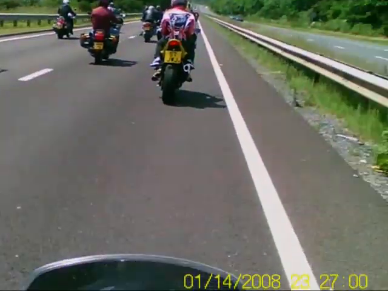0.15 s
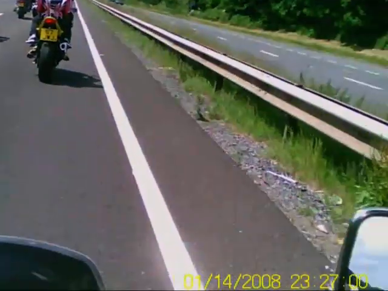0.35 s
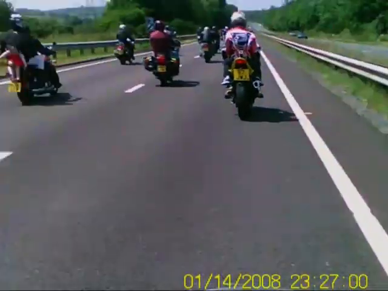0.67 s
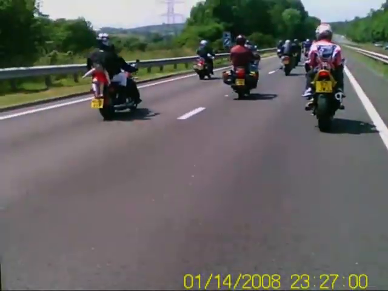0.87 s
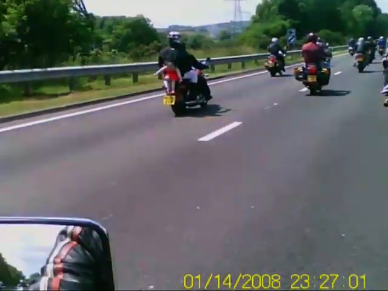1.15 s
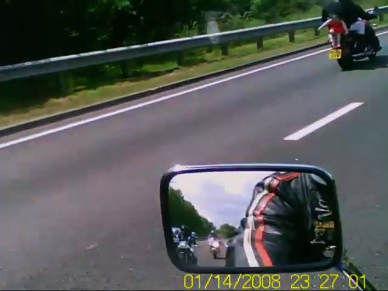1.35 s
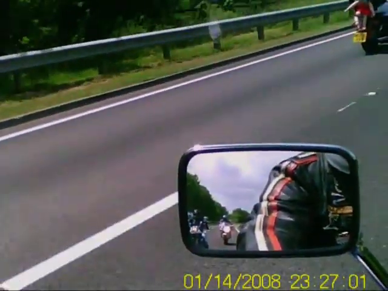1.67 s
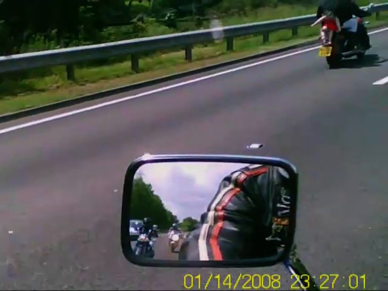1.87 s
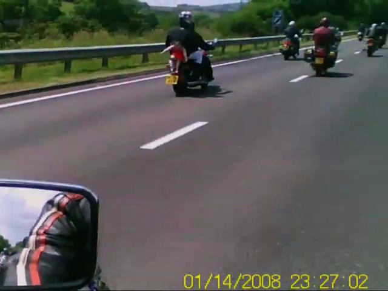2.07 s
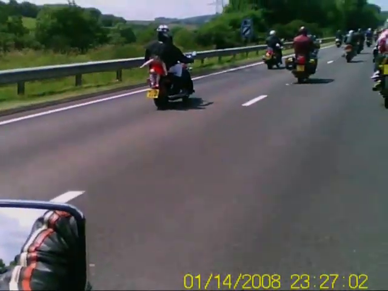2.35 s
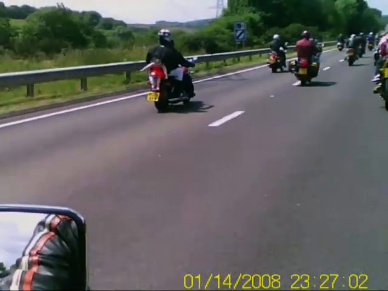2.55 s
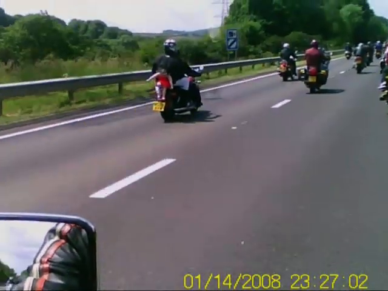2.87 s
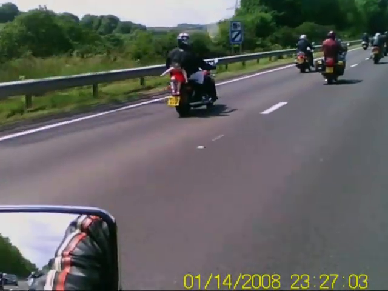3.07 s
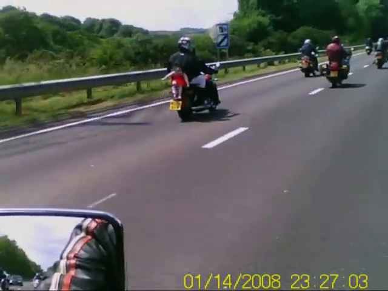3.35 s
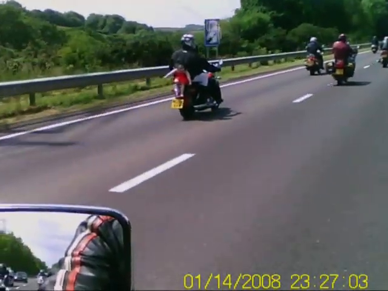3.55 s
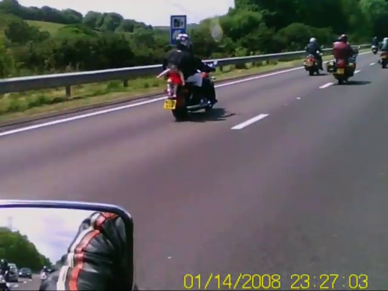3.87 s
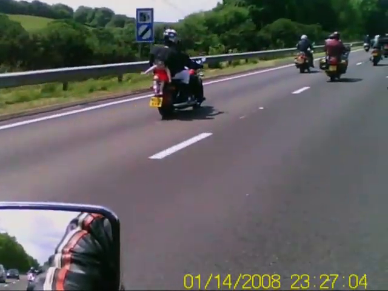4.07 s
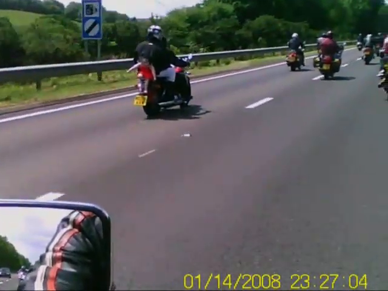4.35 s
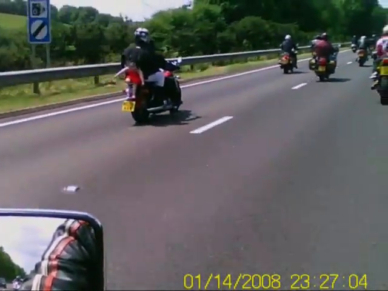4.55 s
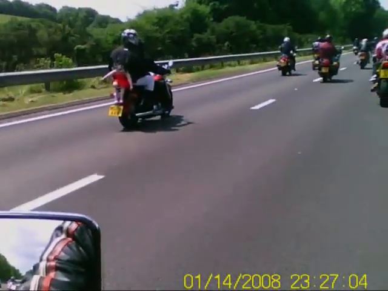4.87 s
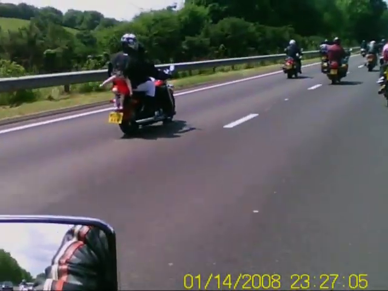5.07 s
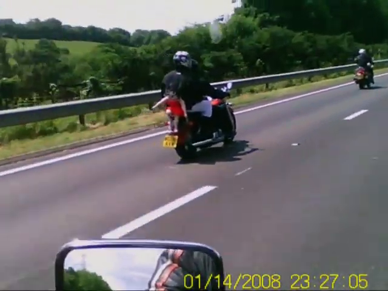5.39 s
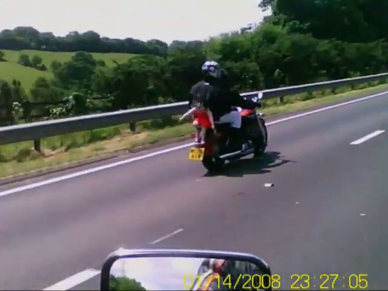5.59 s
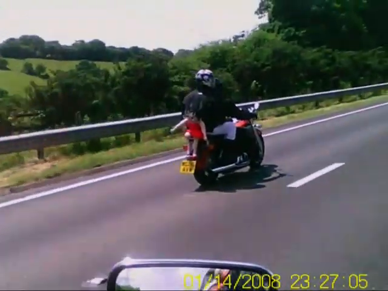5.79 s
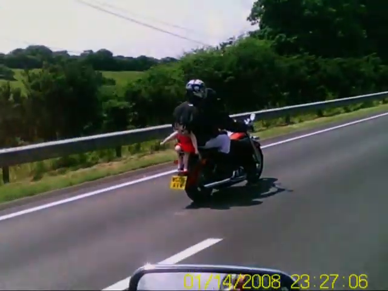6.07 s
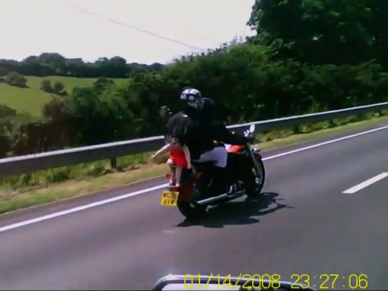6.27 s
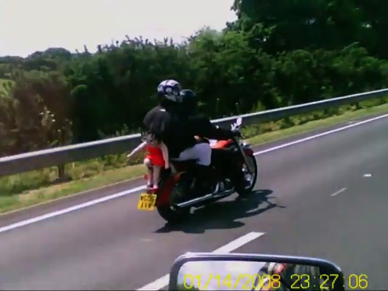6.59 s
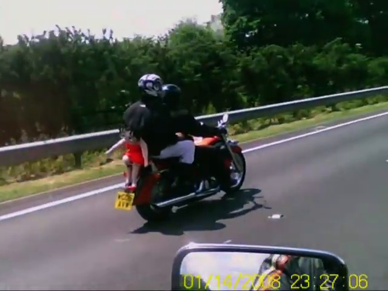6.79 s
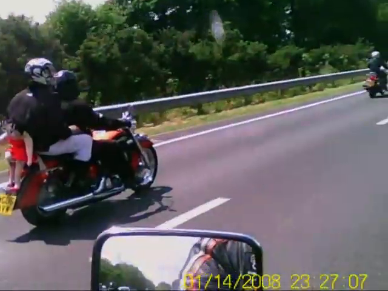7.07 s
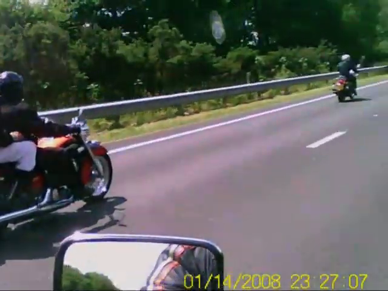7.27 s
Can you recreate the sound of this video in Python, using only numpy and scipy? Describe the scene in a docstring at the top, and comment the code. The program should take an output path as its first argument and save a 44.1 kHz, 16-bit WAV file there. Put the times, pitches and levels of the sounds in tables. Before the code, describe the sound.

Onboard a motorcycle in a moving group, low engine notes rise steadily under heavy wind buffeting, road roar and hiss, then abruptly become quieter.

```python
"""On an open road, a small camera rides on an accelerating motorcycle among other bikes.
Its own engine and a second one close by climb in pitch as summed firing orders; gears add fuzzy shaft tones.
Shaped noise gives the wind buffeting the microphone, the road roar, the hiss and the drone of the pack.
The overall level drops in sudden steps, and the camera whines faintly as a few fixed sines."""
import sys
import numpy as np
from scipy import signal
from scipy.fft import rfft, irfft, next_fast_len
from scipy.io import wavfile
from scipy.ndimage import uniform_filter1d, map_coordinates

SR = 44100
rng = np.random.default_rng(int(sys.argv[2]) if len(sys.argv) > 2 else 0)


def bounce(signal):
    """Save signal as a 16-bit WAV file at the path given by the first command-line argument."""
    frames = np.transpose(np.atleast_2d(signal))
    limited = np.clip(frames, -1, 1)
    pcm = np.round(limited * 32767).astype(np.int16)
    wavfile.write(sys.argv[1], SR, pcm)


N = 327663

# Climbing pitch of each engine: (time [s], firing rate [Hz])
OWN_FIRING_RATE = [(0.0, 64.78), (0.9, 66.95), (1.8, 70.2), (2.4, 73.05), (2.9, 76.55), (3.9, 85.0),
                   (4.5, 88.85), (6.3, 98.05), (7.43, 102.45)]
OTHER_FIRING_RATE = [(0.0, 86.55), (1.0, 90.4), (2.1, 96.05), (3.7, 106.3), (4.8, 111.85), (7.43, 120.9)]
# What each exhaust passes, before the order's own trim: (frequency [Hz], level of an order there [dB rms])
OWN_EXHAUST = [(60, -22), (85, -22.5), (103, -25), (130, -31), (160, -42), (185, -44), (205, -37),
               (230, -33), (265, -30), (310, -29), (365, -28), (410, -30), (455, -45), (520, -52),
               (620, -56), (800, -76)]
OTHER_EXHAUST = [(80, -38), (180, -37), (240, -40), (280, -36), (330, -39), (380, -40), (440, -38),
                 (480, -44), (560, -50), (620, -48), (800, -66)]
# Firing orders against the exhaust; the second engine fires unevenly, so half orders show:
# (order [multiple of firing rate], trim at light throttle [dB], trim at full throttle [dB])
OWN_ORDERS = [(1, 0, 0), (2, 0, 0), (3, 0, 0), (4, -6, 0), (5, -4, -3), (6, -9, -6), (7, -8, -8)]
OTHER_ORDERS = [(1.5, -3, -12), (2, 0, -3), (2.5, -8, -12), (3, 0, 0), (3.5, -9, -14), (4, 0, 0),
                (4.5, -9, -16), (5, 0, -1), (5.5, -4, -14), (6, -2, -6)]
# Both riders open up together: (time [s], throttle [0-1])
THROTTLE = [(0, 0), (2.5, .1), (3.1, .8), (4, 1), (7.43, 1)]
# Gear whine before its moving gain: (order of the own engine [multiple], level [dB rms], spread [knots/s])
GEAR_TONES = [(23, -67, 160), (46, -71, 260)]
# Moving tone balance: (time [s], gear whine gain [dB], gain of the treble in the hiss [dB])
TONE_BALANCE = [(0, 7, 3), (.6, 3, 1.5), (1.2, 3, 4), (2, -1, 4), (3.4, 1, 1.5), (4.3, 5, 1.5),
                (5.2, 0.5, 0), (6.3, -6, 1.5), (7.43, 1, 1.5)]
# The airstream: (time [s], roar level [dB], hiss level [dB], steady buffeting level [dB])
AIRSTREAM = [(0, -25.5, -45.5, -14.5), (.4, -30, -46.5, -25.5), (.9, -29, -48.5, -24.5),
             (1.2, -33, -52, -27), (1.6, -31, -49.5, -24), (2, -32, -52.5, -27.5), (2.6, -30.5, -50, -27.5),
             (3, -28.5, -48, -25), (3.4, -30, -48, -25), (4.2, -33, -48.5, -24.5), (4.8, -32, -48.5, -22.5),
             (5.4, -31.5, -47.5, -20), (5.8, -28, -46.5, -16), (6.4, -30.5, -45, -14.5),
             (6.65, -27.5, -43.5, -13.5), (7, -32.5, -47, -22), (7.43, -29, -44.5, -12)]
# Gusts that thump the microphone: (time [s], peak gain [dB])
THUMPS = [(.23, -18), (.76, -20.5), (1.0, -20.5), (1.51, -22), (1.68, -21), (2.04, -21.5), (2.32, -23.5),
          (3.35, -23), (3.52, -21.5), (4.65, -23), (5.01, -24.5), (5.3, -18.5), (5.51, -21), (5.81, -16),
          (6.04, -11), (6.13, -10.5), (6.33, -16), (6.58, -12), (7.33, -17)]
# Short puffs of air across the port: (time [s], length [s], peak gain [dB])
PUFFS = [(5.67, 0.042, -44), (6.022, .04, -51), (6.088, 0.14, -43), (6.504, 0.057, -41.5),
         (6.64, 0.026, -44), (6.696, 0.08, -43.5), (7.27, 0.055, -47)]
# Relative noise colours of buffeting, puffs, roar and hiss: (frequency [Hz], density [dB per Hz])
BUFFET_COLOUR = [(4, -14.5), (10, 4.5), (22, -6.5), (40, -9.5), (70, -13), (140, -23), (300, -50.5)]
PUFF_COLOUR = [(300, 3), (900, 1), (2400, -7), (3200, -9), (4600, -17), (6500, -30)]
ROAR_COLOUR = [(80, -26.5), (150, 0.5), (220, -0.5), (300, -3.5), (400, -3.5), (500, -11), (620, -17),
               (800, -30), (1200, -55)]
HISS_COLOUR = [(400, 4), (800, -1), (1200, -2.5), (2300, -3.5), (2900, -12), (4200, -15), (4500, -18.5),
               (6300, -20.5), (7100, -27), (9500, -28.5), (11000, -31.5)]
# Deep drone of the pack ahead: (time [s], level [dB])
PACK_LEVEL = [(0, -25), (.5, -24), (1.2, -31.5), (4.5, -28.5), (6.2, -45), (7.43, -30)]
# Relative noise colour of that drone: (frequency [Hz], density [dB per Hz])
PACK_COLOUR = [(50, -26), (80, 13), (130, 14.5), (170, -13.5), (230, -27.5), (320, -28.5)]
# Broad boosts in tone over the whole sound: (frequency [Hz], width [Hz], boost [dB])
TONE_BOOSTS = [(1470, 295, 4), (2120, 460, 3), (4050, 360, 2.5), (6200, 300, 2.5), (8620, 960, 9.5)]
# Overall gain, moving in sudden steps and slow slopes: (time [s], level [dB])
OVERALL_LEVEL = [(0, -3.5), (1, 0), (1.04, -1.5), (3.45, -1), (3.49, -5.5), (5.33, -2), (5.36, -5.5),
                 (6.138, -7.5), (6.148, -20.5), (6.62, -20.5), (6.64, -17.5), (7.43, -14.5)]
# Steady whine of the electronics: (frequency [Hz], level [dB rms])
CAMERA_WHINE = [(5599, -87.5), (7402, -90), (9598, -95)]

BUFFET_SWING_DB = 3  # chance swell of the steady buffeting
THUMP_S, THUMP_HZ = 0.086, 45.5  # length, and the pitch above which a thump fades
TOP_HZ = 11050  # band limit of the camera


def amp(db):
    """Gain of a level in dB."""
    return 10 ** (np.asarray(db) / 20)


def unit(x):
    """Scale x to rms 1."""
    return x / np.sqrt(np.mean(x ** 2) + 1e-20)


def along(points, hz):
    """Read (frequency, value) points on a log axis; -120 outside them."""
    f, value = np.transpose(points)
    return np.interp(np.log(hz + 1), np.log(f + 1), value, left=-120, right=-120)


def curves(rows):
    """Give one value per sample for each column after the time."""
    s, *columns = np.transpose(rows)
    return [np.interp(np.arange(N) / SR, s, column) for column in columns]


def wobble(rate):
    """Draw a smooth random curve with rate knots a second."""
    knots = rng.standard_normal(N // 64)
    return map_coordinates(knots, [np.arange(N) * rate / SR])


def filtered(x, response):
    """Shape the spectrum of x by a response of frequency."""
    m = next_fast_len(N + SR // 2)
    hz = np.fft.rfftfreq(m, 1 / SR)
    return irfft(rfft(x, m) * response(hz), m)[..., :N]


def rush(spectrum, patchy_db):
    """Coloured noise of rms 1 with patches of random gain over time and pitch."""
    z = signal.stft(rng.standard_normal(N), nperseg=512)[2]
    field = uniform_filter1d(rng.standard_normal(z.shape), size=6, axis=0)
    field = uniform_filter1d(field, size=12, axis=1)
    patchy = signal.istft(z * amp(patchy_db * unit(field)), nperseg=512)[1][:N]
    return unit(filtered(patchy, lambda hz: amp(along(spectrum, hz))))


def engine(firing_rate, orders, exhaust, unsteady_db, drift_rad):
    """Firing orders through the exhaust; uneven burning shakes each one's size and phase."""
    rate_hz, = curves(firing_rate)
    throttle, = curves(THROTTLE)
    turn = 2 * np.pi * np.cumsum(rate_hz) / SR  # firing phase [rad]
    note = np.zeros(N)
    for order, light_db, full_db in orders:
        throttle_db = light_db + throttle * (full_db - light_db)
        exhaust_db = along(exhaust, order * rate_hz)
        size = amp(throttle_db + exhaust_db + unsteady_db * wobble(8.3))
        phase = order * turn + drift_rad * wobble(7) + 2 * np.pi * rng.random()
        note += np.sqrt(2) * size * np.sin(phase)
    return note, turn


def gears(turn):
    """Meshing teeth give fuzzy tones tied to the shaft."""
    whine = np.zeros(N)
    for order, db, spread in GEAR_TONES:
        whine += amp(db) * unit(wobble(spread) * np.sin(order * turn))
    return amp(curves(TONE_BALANCE)[0]) * whine


def bumps(rows):
    """Sum bell-shaped swells of gain, each with its own time, length and peak."""
    t = np.arange(N) / SR
    return sum(amp(db) * np.exp(-(2 * (t - s) / length) ** 2) for s, length, db in rows)


def wind():
    """Slow lumps of pressure on the microphone, deep thumps from single gusts, and short bright puffs."""
    lumps = rush(BUFFET_COLOUR, patchy_db=.5)
    # even out the noise's own swell, so the level curve sets the buffeting's strength
    power = uniform_filter1d(lumps ** 2, size=5000)
    lumps = unit(lumps / np.abs(power + .05) ** 0.46)
    deep = filtered(lumps, lambda hz: 1 / (1 + (hz / THUMP_HZ) ** 4))
    steady = amp(curves(AIRSTREAM)[2] + BUFFET_SWING_DB * wobble(8))
    thumps = bumps([(s, THUMP_S, db) for s, db in THUMPS])
    puffs = bumps(PUFFS) * rush(PUFF_COLOUR, patchy_db=2.0)
    return steady * lumps + thumps * unit(deep) + puffs


def road(turn):
    """Tyre roar, the drone of distant bikes, and a hiss that pulses a little with each firing."""
    roar_db, hiss_db = curves(AIRSTREAM)[:2]
    gust = wobble(3.045)  # shared by roar and hiss
    roar = amp(roar_db + 0.44 * gust) * rush(ROAR_COLOUR, patchy_db=2.03)
    drone = amp(curves(PACK_LEVEL)[0]) * rush(PACK_COLOUR, patchy_db=-0.3)
    flutter = amp(0.66 * gust + 0.15 * wobble(19) + 0.39 * wobble(60) + 0.6 * np.sin(turn))
    hiss = unit(flutter * rush(HISS_COLOUR, patchy_db=0.52))
    treble = filtered(hiss, lambda hz: 1 / (1 + (4500 / (hz + 1)) ** 4))
    balanced = hiss - treble + amp(curves(TONE_BALANCE)[1]) * treble
    return roar + drone + amp(hiss_db) * balanced


def scene():
    """Both engines, gears, wind and road at one microphone."""
    own, turn = engine(OWN_FIRING_RATE, OWN_ORDERS, OWN_EXHAUST, unsteady_db=.8, drift_rad=.12)
    other, _ = engine(OTHER_FIRING_RATE, OTHER_ORDERS, OTHER_EXHAUST, unsteady_db=1.2, drift_rad=.2)
    return (own + other + gears(turn) + wind() + road(turn))[None]


def camera_whine():
    """Electronics sing as a few faint, steady sines."""
    t = np.arange(N) / SR
    return sum(np.sqrt(2) * amp(db) * np.sin(2 * np.pi * hz * t) for hz, db in CAMERA_WHINE)


def record(dry):
    """Broad tone boosts, level steps, the camera's own whine and faint noise, soft overload, then the band limit."""
    boosts = lambda hz: amp(sum(db / (1 + (2 * (hz - c) / w) ** 2) for c, w, db in TONE_BOOSTS))
    x = filtered(dry, boosts) * amp(curves(OVERALL_LEVEL)[0])
    x = x + camera_whine() + amp(-78.0) * rng.standard_normal(N)
    x = x / (1 + np.abs(x / .42) ** 4) ** (1 / 4)  # the input stage rounds off the biggest thumps
    return filtered(x, lambda hz: hz < TOP_HZ)


dry = scene()
out = record(dry)
bounce(out)
```